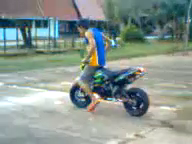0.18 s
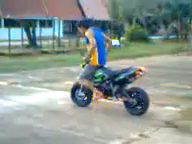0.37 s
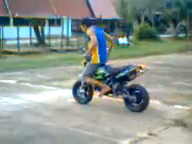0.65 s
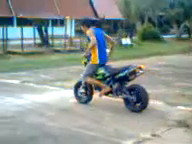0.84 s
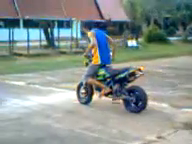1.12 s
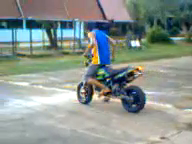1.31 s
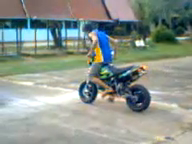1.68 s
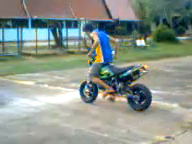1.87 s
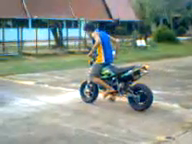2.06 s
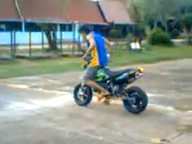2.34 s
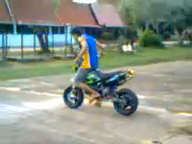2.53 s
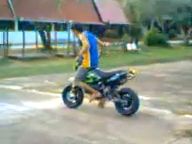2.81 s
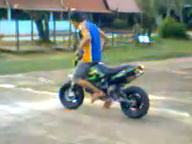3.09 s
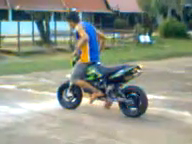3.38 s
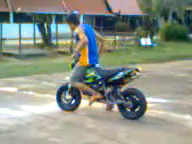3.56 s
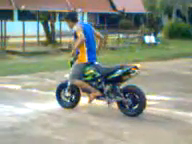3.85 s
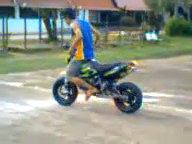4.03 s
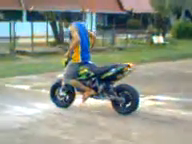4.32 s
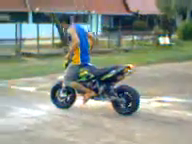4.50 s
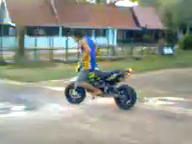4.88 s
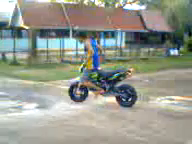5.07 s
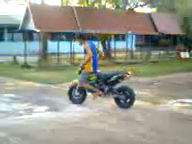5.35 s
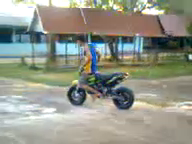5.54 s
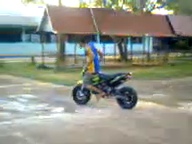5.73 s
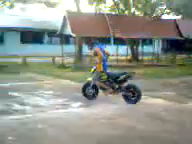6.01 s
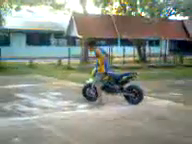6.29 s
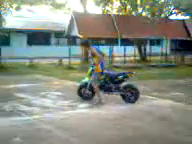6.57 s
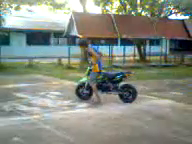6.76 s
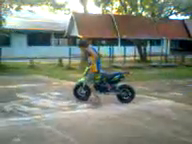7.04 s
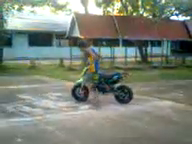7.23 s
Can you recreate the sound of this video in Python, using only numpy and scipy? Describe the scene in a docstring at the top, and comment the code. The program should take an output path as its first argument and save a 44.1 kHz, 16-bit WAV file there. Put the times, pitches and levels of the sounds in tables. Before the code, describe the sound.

A small single-cylinder motorcycle in an outdoor concrete yard, heard through a narrow-band phone microphone that flattens loud peaks. From 0 to 1.5 s a raspy engine flutters at about thirty firings a second, with a barky exhaust and broad noisy rush. Around 1.5 s revs climb and the tyre scrubs hoarsely; from 1.7 s it squeals loudly near 1600 Hz, rough and tumbling, masking the engine. Strong bites continue to about 4 s, with dry pops near 2.8 and 3.1. The squeal drops away around 4.1 to 4.4 s, then returns in short, slightly lower chirps between 4.5 and 5.4, with snaps at 4.5, 5.0 and 5.5. Another sharp pop comes at 5.8 and a heavy thudding one at 6.0. Brighter squeals and hoarse skids surge from 6.1, stuttering near 6.6 and 6.9, with a last sustained squeal from 7.2 to the end.

```python
"""In an open yard a small single-cylinder motorcycle fires about thirty times a second over a broad noisy rush.
After a second and a half the rear tyre spins and squeals on wet concrete; sharp pops join in later.
The engine and squeals are made of resonances and tumbling tones, the rush of shaped noise, the pops of short ringing.
A phone takes it all in a narrow band, squashes the loud peaks and clips what still overshoots."""
import sys
import numpy as np
from scipy import signal
from scipy.fft import rfft, irfft, next_fast_len
from scipy.io import wavfile
from scipy.ndimage import uniform_filter1d, map_coordinates

SR = 44100
rng = np.random.default_rng(int(sys.argv[2]) if len(sys.argv) > 2 else 0)


def log_audio(samples):
    """Write samples as a 16-bit WAV file to the path given in sys.argv[1]."""
    # one column per channel
    frames = np.atleast_2d(samples).T
    # limit to full scale, then quantise
    limited = np.clip(frames, -1, 1)
    pcm = np.round(limited * 32767).astype(np.int16)
    wavfile.write(sys.argv[1], SR, pcm)


def voltage_ratio(level):
    """Linear amplitude factor for a level in decibels (scalar or array-like)."""
    return 10 ** (np.asarray(level, float) / 20)


N = 326340  # length in samples


def unit(x):
    """Scales x to an average strength (rms) of 1."""
    return x / np.sqrt(np.mean(np.abs(x) ** 2) + 1e-20)


def curves(rows):
    """Joins the rows by straight lines: one value per sample for each column after the time."""
    seconds, *columns = np.transpose(rows)
    t = np.arange(N) / SR
    return [np.interp(t, seconds, column) for column in columns]


def wobble(rate):
    """A smooth random curve through `rate` random points a second, at rms 1."""
    points = rng.standard_normal(int(N * rate / SR) + 4)
    return unit(map_coordinates(points, [np.arange(N) * rate / SR]))


def filtered(x, response):
    """Multiplies each frequency in x by response(frequency in Hz)."""
    m = next_fast_len(N + SR // 2)
    hz = np.fft.rfftfreq(m, 1 / SR)
    return irfft(rfft(x, m) * response(hz), m)[:N]


def ring(x, modes):
    """Lets x ring a set of resonances, side by side with alternating sign; a narrow one rings longer."""
    def response(hz):
        total = 0
        for k, (centre, width, db) in enumerate(modes):
            damping = 1j * hz * width
            total = total + (-1) ** k * voltage_ratio(db) * damping / (centre ** 2 - hz ** 2 + damping)
        return total
    return filtered(x, response)


def coloured(x, points):
    """Shapes x by a (Hz, dB) spectrum, then scales it to rms 1."""
    point_hz, point_db = np.transpose(points)
    return unit(filtered(x, lambda hz: voltage_ratio(np.interp(np.log(hz + 1), np.log(point_hz), point_db))))


def swells(start, hold, rise_db_per_s, fall_db_per_s):
    """One power curve per event, every 32 samples: a steady climb in dB, a hold, a steady fall."""
    t = np.arange(0, N, 32) / SR - start[:, None]
    climb_db = rise_db_per_s * np.minimum(t, 0)
    fall_db = fall_db_per_s * np.maximum(t - hold[:, None], 0)
    return voltage_ratio(2 * np.maximum(climb_db - fall_db, -150))  # doubled dB: power, not amplitude


def blend(shape, level_db, hz=None):
    """Summed power of the events; with hz, their frequency averaged by strength instead."""
    power = shape * voltage_ratio(2 * level_db)[:, None]
    total = power.sum(axis=0)
    if hz is not None:
        total = hz @ power / total
    return np.repeat(total, 32)[:N]


def yard(x):
    """The concrete and buildings send back a short answer: noise that fades by 60 dB in 62 ms."""
    t = np.arange(SR // 4) / SR
    tail = rng.standard_normal(len(t)) * voltage_ratio(-60 * t / 0.062)
    tail *= t > .006  # the first echo takes 6 ms
    return signal.fftconvolve(x, tail / np.linalg.norm(tail))[:N]


def rush():
    """A broad rush: background noise under the engine first, tyre scrub from about 1.4 s; noise of lumpy strength."""
    # Each row: time in seconds, level in dB.
    levels = [(0.0, -24), (1.26, -43.5), (1.44, -24.5), (1.73, -20), (2.08, -24.5), (2.39, -24),
              (2.55, -33), (2.8, -31.5), (3.38, -28), (3.9, -26), (4.18, -45.5), (4.35, -44.5), (4.55, -33),
              (4.75, -36.5), (5.54, -37), (6.0, -27.5), (6.08, -19), (6.26, -35), (6.45, -32), (6.7, -29),
              (7.4, -28.5)]
    # Colour of the rush. Each row: frequency in Hz, relative level in dB per Hz.
    colour = [(25, -8), (70, -0.5), (200, -1), (600, -2), (1000, -0.5), (1500, -1), (2200, 3), (3000, -2.5),
              (3600, 3.5), (4200, -3.5)]
    lumps = voltage_ratio(1.2 * wobble(12) + 2.4 * wobble(120))  # slow and quick lumps
    return voltage_ratio(curves(levels)[0]) * coloured(lumps * rng.standard_normal(N), colour)


def engine():
    """Each firing thumps the pipe and blows a noisy burst into the silencer shell; the gear whirrs steadily."""
    # Engine speed. Each row: time in seconds, firings per second before a small random jitter.
    revs = [(0.0, 29.88), (0.25, 28.44), (0.75, 28.05), (1.0, 28.43), (1.25, 27.61), (1.5, 29.18),
            (1.75, 33.38), (2.25, 37.99), (2.5, 35.53), (3.25, 37.54), (3.9, 36.77), (4.25, 33.37),
            (4.5, 35.1), (5.0, 31.74), (5.3, 27.8), (5.5, 28.96), (5.8, 36.3), (6.2, 38.86), (7.4, 34.95)]
    # Exhaust as heard. Each row: time in seconds, thump level in dB, bark in dB above the thump.
    exhaust = [(0.0, -27, 7), (0.16, -30, 8.5), (1.03, -23, 1.5), (1.62, -28.5, 8.5), (1.8, -34, 9.5),
               (2.2, -41, 14), (2.66, -52.5, 16.5), (3.1, -39, 7), (3.5, -39, 10.5), (4.0, -44, 4.5),
               (4.62, -40, 2.5), (4.8, -45.5, 4), (4.86, -35, 0.5), (5.17, -36.5, -1.5),
               (5.24, -44.5, -2.5), (5.61, -37, 0.5), (6.04, -38.5, -1), (6.3, -57.5, 12), (6.85, -57, 5),
               (7.0, -38, 2), (7.4, -69, 8.5)]
    # Pipe resonances, struck alike by every firing. Each row: centre in Hz, width in Hz, relative level in dB.
    pipe = [(162.4, 40, -4), (197.6, 21.8, 2.5), (286, 30, -6), (341, 33, -4.5), (388, 37.6, -2.5)]
    # Silencer shell resonances. Each row: centre in Hz, width in Hz, relative level in dB for one passage.
    shell = [(1211.5, 190, 7), (2513, 214, 2.5), (3580, 1000, -4.5)]
    # Steady whirr of valve gear and chain. Each row: frequency in Hz, relative level in dB per Hz.
    whirr_colour = [(15, -52.5), (25, -22.5), (92, -12.5), (184, -6.5), (381, -12.5), (772, -27.5),
                    (1210, -12.5), (1710, -34), (2510, -19), (3610, -30.5), (4200, -31), (5460, -71),
                    (9240, -120)]

    thump_db, bark_db = curves(exhaust)
    turns = np.cumsum(curves(revs)[0]) / SR + 0.1288 + 0.0043 * wobble(30)
    at = np.flatnonzero(np.diff(np.floor(turns)))  # one firing at each whole number
    size = rng.standard_normal((len(at), 2))
    firing, burst = np.zeros(N), np.zeros(N)
    firing[at] = voltage_ratio(0.9 * size[:, 0])  # strengths vary by about 1 dB
    burst[at] = voltage_ratio(1.0 * size[:, 1])

    # the gas leaves in a quick gust, returns once from the pipe end and trails off in a hiss
    t = np.arange(SR // 20) / SR
    opening = 1 - np.exp(-t / 0.00081)
    gust = opening * (voltage_ratio(-60 * t / 0.012) + 0.065 * voltage_ratio(-60 * t / 0.063))
    gust += 0.28 * np.roll(gust, round(0.0062 * SR))
    gas = signal.fftconvolve(burst, gust)[:N] * rng.standard_normal(N)
    # the opening valve gives the shell a short knock of the same shape every time
    knock = np.hanning(19) * 0.36
    gas += signal.fftconvolve(burst, knock)[:N]

    thump = unit(ring(ring(firing, pipe), [(234, 310, 0)]))  # then one broad resonance
    bark = unit(ring(ring(gas, shell), shell))  # through the shell twice
    whirr = coloured(rng.standard_normal(N), whirr_colour)
    return voltage_ratio(thump_db) * (thump + voltage_ratio(bark_db) * bark + voltage_ratio(-10) * whirr)


def pops():
    """Single dry snaps: a click rings a low body and a bright edge, which die away at once."""
    # Each row: time in seconds, body peak in dB, treble peak in dB above the body.
    snaps = [(2.7664, -27, 19.5), (3.0894, -12.5, -1), (4.533, -17, 0), (5.0271, -8.5, -2),
             (5.4629, -18.5, 2.5), (5.7997, -8.5, 4), (6.0344, -2, -16)]
    # Resonances of the body. Each row: centre in Hz, width in Hz, relative level in dB.
    body_modes = [(383, 110, 5), (800, 332, 5.5)]
    # Resonances of the treble edge. Each row: centre in Hz, width in Hz, relative level in dB.
    edge_modes = [(2150, 370, 5), (3440, 3500, -8)]
    sound = np.zeros(N + SR)
    click = 1. * (np.arange(N) == 0)
    body = ring(click, body_modes)[:SR // 10]
    edge = ring(click, edge_modes)[:SR // 10]
    body, edge = body / np.abs(body).max(), edge / np.abs(edge).max()
    for seconds, db, treble_db in snaps:
        snap = body + voltage_ratio(treble_db) * edge
        first = round(seconds * SR)
        sound[first:first + len(snap)] += voltage_ratio(db) * snap
    return sound[:N]


def slipping(pitch_hz, width_hz, skirt, chatter_db, chatter_rate):
    """Many tread blocks slip out of step: a tone whose strength and phase tumble at random."""
    def spread(hz):
        return np.exp(-(hz / width_hz) ** 2) + skirt / (1 + (hz / width_hz) ** 2)
    a = filtered(rng.standard_normal(N), spread)
    b = filtered(rng.standard_normal(N), spread)
    tumble = unit(a + 1j * b)
    # a slipping block cannot swing beyond its grip, so the strongest swells are held back
    tumble /= np.sqrt(1 + np.abs(tumble / 2.6) ** 2)
    tumble = tumble * voltage_ratio(chatter_db * wobble(chatter_rate))
    # the load on the tread is steady, so slow changes are partly evened out and quick ripple stays
    tumble /= np.abs(uniform_filter1d(np.abs(tumble) ** 2, size=1800)) ** 0.29
    phase = 2 * np.pi * np.cumsum(pitch_hz) / SR
    return unit(np.real(tumble * np.exp(1j * phase)))


def skids():
    """A higher, hoarser slip: a tumbling tone spread wider than the squeal's."""
    # Each row: time of full strength in seconds, hold in seconds, level in dB, centre in Hz.
    start, hold, level_db, centre_hz = np.transpose([(1.562, .11, -25.5, 2150), (1.76, .45, -32, 2069),
                                                     (4.508, .15, -37.5, 2350), (4.766, .01, -32, 2556),
                                                     (5.0, .44, -41, 2404), (5.73, 0.016, -22.5, 2090),
                                                     (5.865, .15, -17.5, 2095), (6.6, .2, -31.5, 2095),
                                                     (6.906, 0.054, -16, 2138), (6.99, .2, -19.5, 2070)])
    shape = swells(start, hold, rise_db_per_s=199.5, fall_db_per_s=170)
    pitch_hz = blend(shape, level_db, centre_hz)
    hoarse = slipping(pitch_hz, width_hz=280, skirt=.4, chatter_db=5.0, chatter_rate=95)
    return np.sqrt(blend(shape, level_db)) * hoarse


def squeal():
    """The tread bites and squeals, a weaker slip drags on between bites, and a grainier overtone goes along."""
    # Each row: time of full strength in seconds, hold in seconds, level in dB, pitch in Hz, overtone level in dB.
    start, hold, level_db, bite_hz, overtone_db = np.transpose([(1.689, .06, -10, 1665, -14.5),
                                                                (1.77, 0.02, -12, 1650, -26),
                                                                (1.938, .035, -9, 1650, -15.5),
                                                                (2.171, .06, -13.5, 1637, -23),
                                                                (2.268, 0.058, -10, 1565, -24.5),
                                                                (2.373, .25, -10, 1548, -24.5),
                                                                (2.846, .12, -10.5, 1565, -26),
                                                                (3.003, .08, -14, 1630, -27.5),
                                                                (3.353, .055, -12, 1519, -53),
                                                                (3.517, .26, -9.5, 1555, -29.5),
                                                                (3.821, .17, -9.5, 1551, -23),
                                                                (4.103, .06, -25.5, 1388, -64),
                                                                (4.288, .04, -28.5, 1573, -47),
                                                                (4.526, 0.014, -11, 1530, -31.5),
                                                                (4.7, .03, -18, 1476, -61.5),
                                                                (4.743, .075, -11, 1432, -26.5),
                                                                (4.934, .012, -18, 1350, -35),
                                                                (5.031, .05, -22, 1402, -39.5),
                                                                (5.214, 0.053, -11, 1525, -34),
                                                                (5.337, .012, -21, 1454, -44),
                                                                (5.382, .012, -22, 1636, -35),
                                                                (6.083, .13, -10.5, 1650, -11),
                                                                (6.228, .06, -12, 1608, -22.5),
                                                                (6.408, 0.026, -20.5, 1703, -24),
                                                                (6.571, .1, -13.5, 1700, -12),
                                                                (6.703, .03, -22, 1722, -23.5),
                                                                (6.928, 0.1, -15, 1730, -11.5),
                                                                (7.025, .13, -20.5, 1771, -9),
                                                                (7.243, .2, -10.5, 1593, -19.5)])
    # The drag between bites. Each row: time in seconds, level in dB, overtone frequency as a multiple of the pitch.
    drag_rows = [(1.48, -32, 2.2), (1.66, -22.5, 2.05), (2.1, -16, 2.1), (2.75, -22, 2.08),
                 (3.25, -23.5, 2.1), (3.5, -19.5, 2.2), (4.0, -28.5, 2.05), (4.25, -32, 2.05),
                 (4.38, -49, 2.0), (4.65, -30, 1.93), (4.9, -42, 1.95), (5.15, -31, 1.95),
                 (5.45, -44.5, 2.1), (6.0, -45.5, 2.13), (6.5, -34.5, 2.07), (6.72, -30, 2.05),
                 (6.85, -35, 2.07), (7.1, -24, 2.03), (7.4, -21.5, 2.1)]
    shape = swells(start, hold, rise_db_per_s=1099, fall_db_per_s=420.5)
    pitch_hz = uniform_filter1d(blend(shape, level_db, bite_hz), size=1500, mode="nearest")
    tone = slipping(pitch_hz, width_hz=92.2, skirt=0.77, chatter_db=3.0, chatter_rate=80)
    # the overtone comes from the same slips, so it throbs along with the tone
    throb = np.abs(uniform_filter1d(tone ** 2, size=90)) ** 0.32
    drag_db, ratio = curves(drag_rows)
    grain = slipping(ratio * pitch_hz, width_hz=239, skirt=0.97, chatter_db=4.0, chatter_rate=75)
    overtone = unit(throb * grain)
    # the drag is silent at first and fades in over 900 samples around its first row
    started = 1. * (np.arange(N) / SR > drag_rows[0][0])
    drag_power = uniform_filter1d(started, size=900, mode="nearest") * voltage_ratio(2 * drag_db)
    tone_power = blend(shape, level_db) + drag_power
    overtone_power = blend(shape, overtone_db) + drag_power * voltage_ratio(2 * -21)  # 21 dB below the drag
    return np.sqrt(tone_power) * tone + np.sqrt(overtone_power) * overtone


def scene():
    """Engine and pops with the yard's answer, then the rush, skids and squeal."""
    near = engine() + pops()
    return (near + voltage_ratio(-13.0) * yard(near) + rush() + skids() + squeal())[None]


def roll_off(x):
    """The treble ends steeply here."""
    return signal.sosfilt(signal.butter(12, 15900, fs=SR, output="sos"), x)


def record(dry):
    """The phone's input squashes loud peaks and keeps a narrow band; what still overshoots is clipped flat."""
    squashed = dry[0] / (1 + np.abs(dry[0] / 0.99) ** 3) ** (1 / 3)

    def band(hz):
        low_cut = 1 - np.exp(-(hz / 45) ** 2)
        return low_cut / (1 + (hz / 3950) ** 16) / (1 + (hz / 4450) ** 60)
    clipped = np.clip(filtered(squashed, band), -.735, .735)
    return roll_off(clipped[None])


dry = scene()
out = record(dry)
log_audio(out)
```